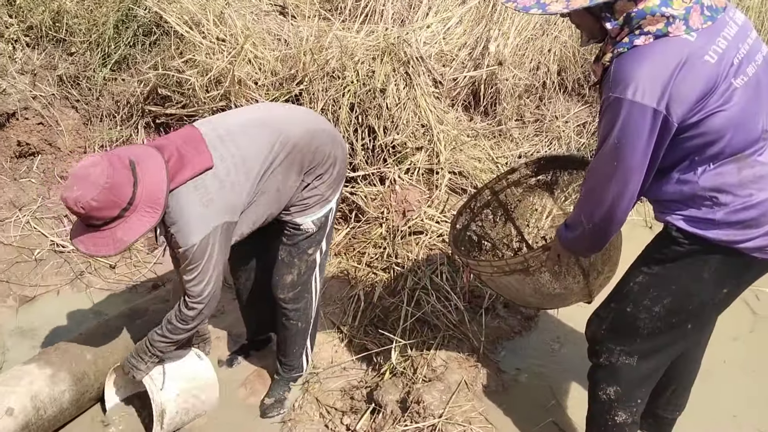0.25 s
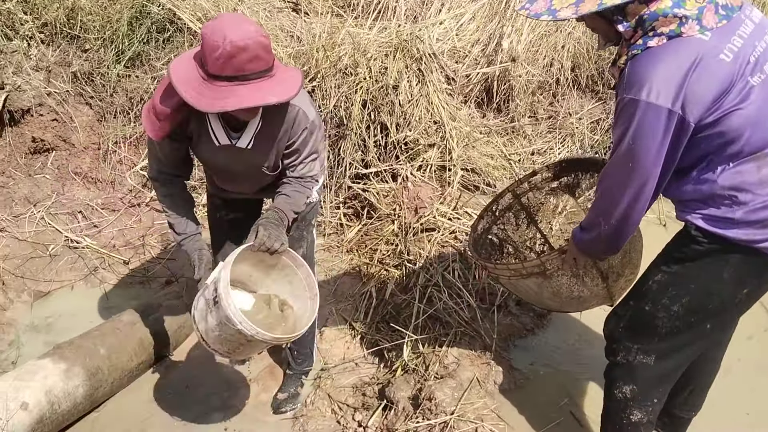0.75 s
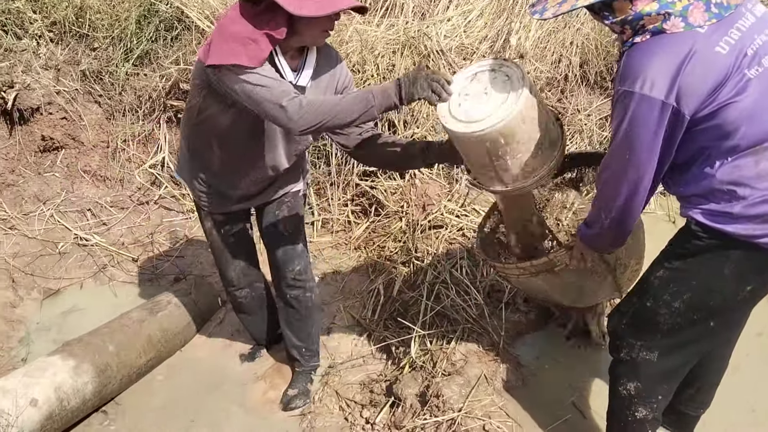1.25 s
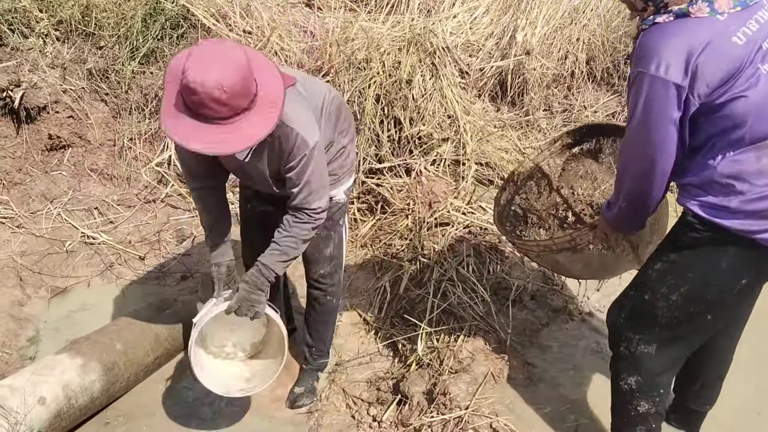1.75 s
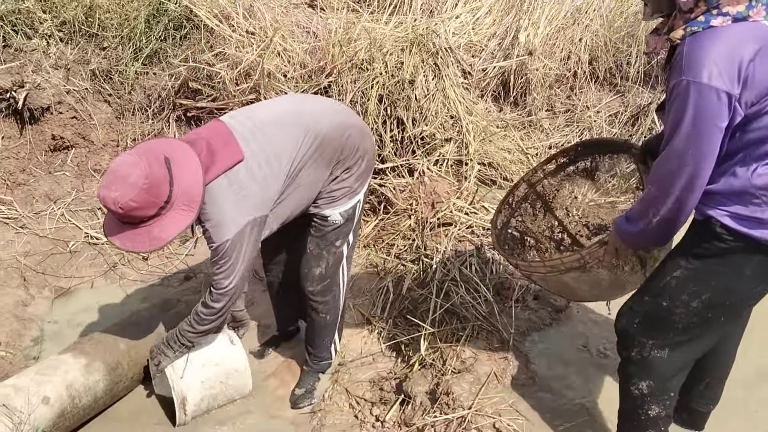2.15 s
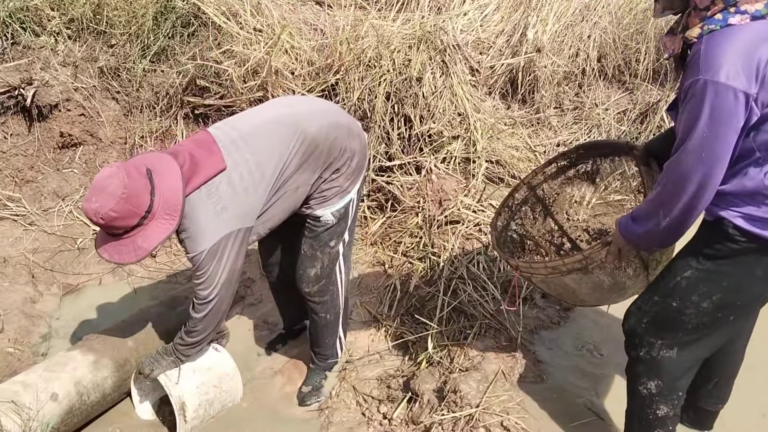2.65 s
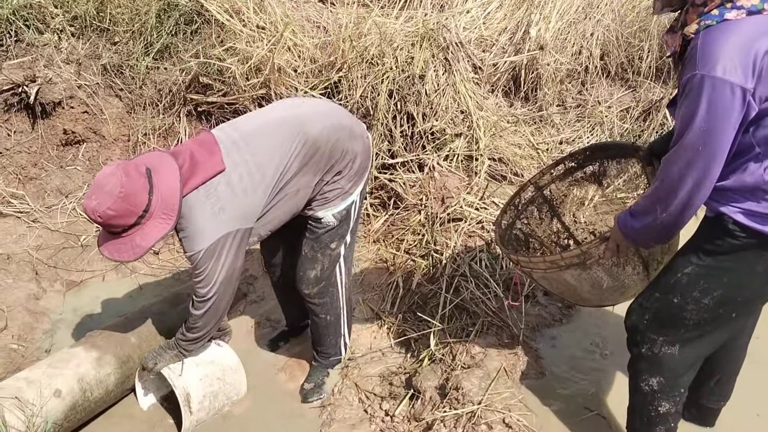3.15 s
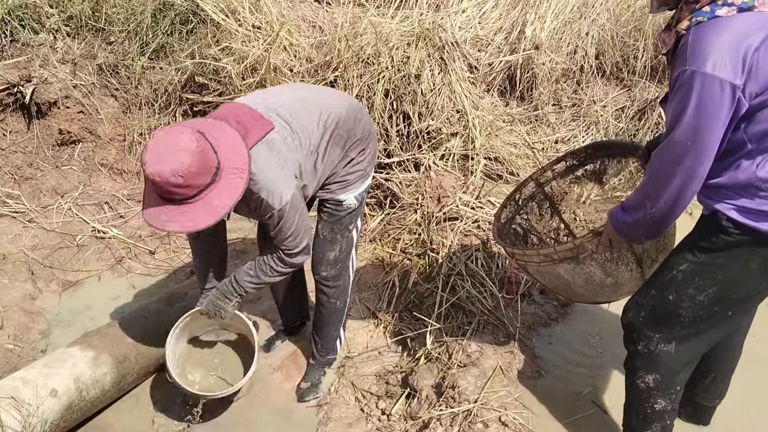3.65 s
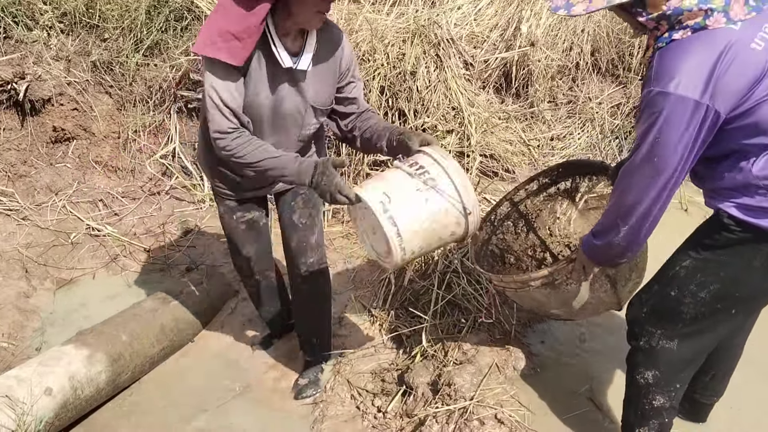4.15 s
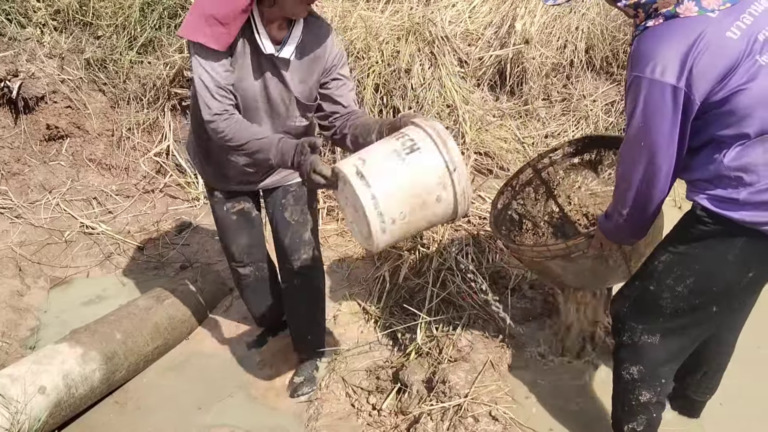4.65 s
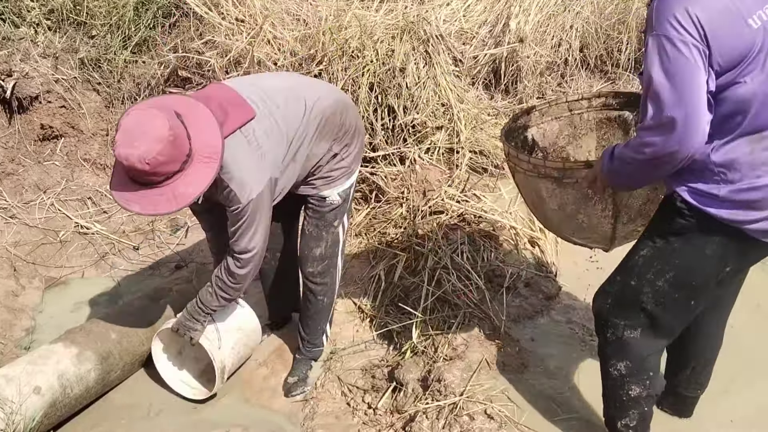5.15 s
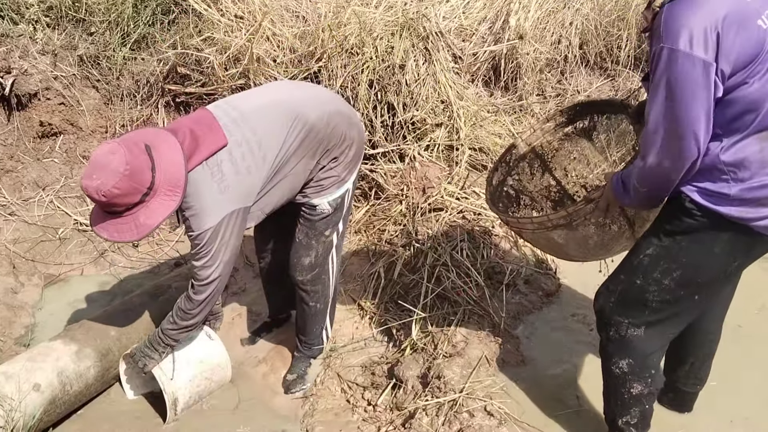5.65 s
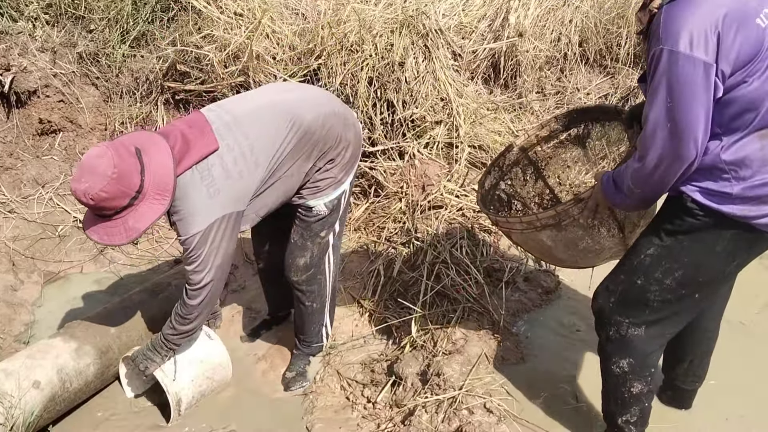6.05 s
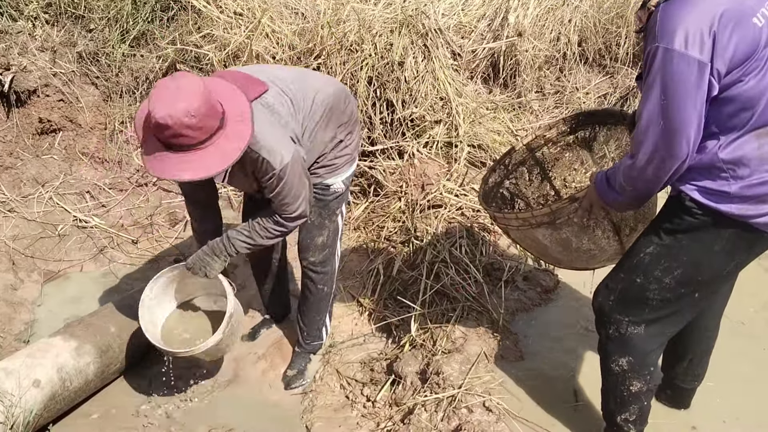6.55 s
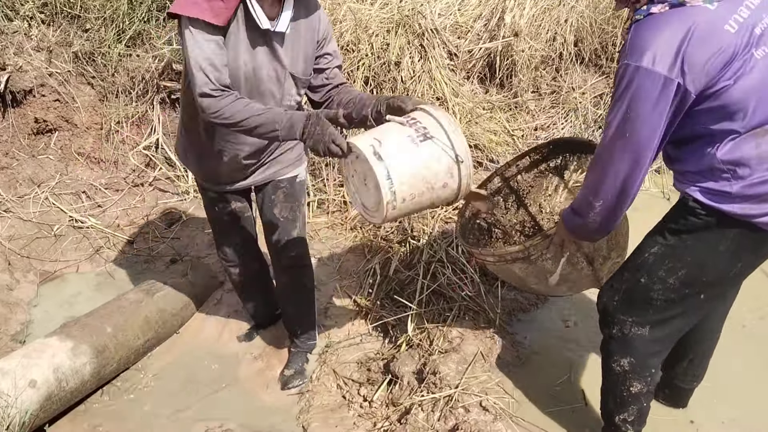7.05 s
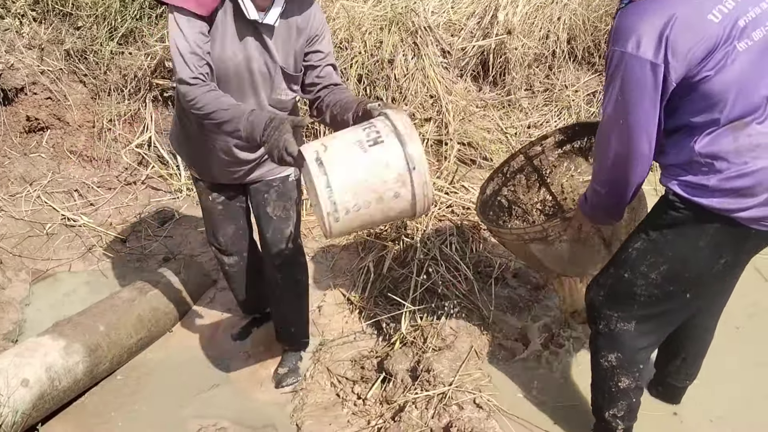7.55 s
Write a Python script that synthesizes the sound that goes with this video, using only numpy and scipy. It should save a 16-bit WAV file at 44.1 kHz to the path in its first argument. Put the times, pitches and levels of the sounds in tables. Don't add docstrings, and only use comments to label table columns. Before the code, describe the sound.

Outdoors in a quiet field, close to a hand-held phone, low wind rumbles and thumps unevenly, with a heavy puff near 0.15 s and others around 2.8, 3.3 and 4.9 s. Small bubbles and drips sound at 0.4-0.7 s as a bucket lifts. At 1.2-1.6 s muddy water gushes through a basket sieve and spatters, then thins to sparse drops. From 2.1 to 2.8 s the bucket dips with busy plops, foam fizz, splats and a deep gulp at 2.4 s. Quieter lapping and drips follow. A second, harder splash comes at 4.4-4.9 s, ending in a hollow gulp. Sloshing, bubbles and bright ticks run from 5.1 to 5.8 s; a wet slap and plop come at 6.5-6.6 s. The third pour splashes at 7.3-7.7 s and drains away. Faint high cricket chirps appear near 0.1, 3.2, 3.8-4, 5 and 5.9 s over soft distant air.

```python
import sys
import numpy as np
from scipy import signal
from scipy.fft import rfft, irfft
from scipy.io import wavfile
from scipy.ndimage import uniform_filter1d

SR = 44100
rng = np.random.default_rng(int(sys.argv[2]) if len(sys.argv) > 2 else 0)


def how_loud(loudness_db):
    steps = np.asarray(loudness_db, float) / 20
    return 10 ** steps


def unload_wav(signal):
    wavfile.write(
        sys.argv[1],
        SR,
        np.round(np.clip(np.atleast_2d(signal).T, -1, 1) * 32767).astype(np.int16),
    )


N = 343539


def rms_one(x):
    return x / np.sqrt(np.mean(x ** 2) + 1e-20)


def drift(rate_hz):
    r = np.exp(-80 * np.pi * rate_hz / SR)
    noise = rng.standard_normal(N // 40 + 2002)
    slow = signal.lfilter([1], [1, -2 * r, r * r], noise)[2000:]
    return np.interp(np.arange(N) / 40, np.arange(len(slow)), rms_one(slow))


def band(x, low_hz, high_hz, order=2):
    sos = signal.butter(order, [low_hz, min(high_hz, .46 * SR)], "band", fs=SR, output="sos")
    return signal.sosfilt(sos, x)


def bell(x, hz, width_hz, db):
    a, w = how_loud(db / 2), 2 * np.pi * hz / SR
    k = np.sin(w) * width_hz / hz / 2
    top = [1 + k * a, -2 * np.cos(w), 1 - k * a]
    bottom = [1 + k / a, -2 * np.cos(w), 1 - k / a]
    return signal.lfilter(top, bottom, x)


def placed(x, left_lag):
    return np.array([np.roll(x, int(round(left_lag))), x])


def add(track, start_s, sound):
    i = round(start_s * SR)
    track[:, i:i + sound.shape[1]] += sound[:, :N - i]


def swell(peak_s, db, rise_s, fall_s):
    t = np.arange(N) / SR - peak_s
    return db - 20 * np.where(t < 0, -t / rise_s, t / fall_s)


def ringing(clicks, hz, cycles):
    r, w = how_loud(-60 * hz / (cycles * SR)), 2 * np.pi * hz / SR
    return signal.sosfilt([[1, 0, -1, 1, -2 * r * np.cos(w), r * r]] * 2, clicks + 1e-18)


def grains(levels_db, low_hz, high_hz, count, per_s, cycles, uneven_db, clump_db, own_db, left_lag, spread):
    out, clumps = np.zeros((2, N)), drift(18.4)
    size = how_loud(uneven_db * np.minimum(rng.exponential(1, N), 4)) * rng.choice([-1, 1], N)
    full_rate = np.sum(per_s / np.max(per_s) * np.ones(N))
    for k, hz in enumerate(np.geomspace(low_hz, high_hz, count)):
        clicks = size * (rng.random(N) < per_s * np.sqrt(hz / 2000) / SR)
        rings = ringing(clicks, hz, cycles)
        rings /= np.sqrt(np.sum(rings ** 2) / full_rate)
        place = k / (count - 1) * (len(levels_db) - 1)
        below = min(int(place), len(levels_db) - 2)
        db = levels_db[below] + (place - below) * (levels_db[below + 1] - levels_db[below])
        db = db + clump_db * clumps + own_db * drift(15.7)
        out += placed(how_loud(db) * rings, left_lag + spread * rng.standard_normal())
    return out


def wind():
    # (time [s], strength [dB], left minus right [dB], rise and fall [s per 20 dB])
    puffs = [(.08, -35, -13, 0.24), (.62, -38, -0.5, .3), (.83, -31.5, -0.5, 0.3153),
             (1.1, -32.5, -1, 0.4044), (1.7, -35, -4, 0.2261), (2.21, -35, 1, 0.2432),
             (2.46, -37.5, -8.5, 0.48), (2.85, -34, 5, 0.5048), (3.31, -31.5, -1, 0.34),
             (3.9, -31, 1, 0.16), (4.27, -31, -3.5, 0.3083), (4.89, -41.5, 1.5, 0.28),
             (5.19, -36, 3.5, 0.07), (5.34, -40.5, -12, 0.41), (5.67, -42.5, 15.5, 0.48),
             (5.85, -44.5, -12, 0.28), (6.15, -34.5, 9.5, 0.3567), (6.46, -39.5, -1, 0.1),
             (6.82, -37, -3, .5), (7.08, -39.5, -6.5, 0.196), (7.62, -46.5, -9, 0.5)]
    out = []
    for side in (.5, -.5):
        swells = [swell(s, db + side * lean_db, span_s, span_s) for s, db, lean_db, span_s in puffs]
        rumble_db = np.max(swells, axis=0).clip(-55.5)
        lumps, noise = drift(8.48), rng.standard_normal((2, N))
        flutter_db = 0.329 * (rumble_db + 38.0) + 5.09 * lumps + 2.98 * drift(33) - 57.5
        rumble = how_loud(rumble_db + 3.28 * lumps - 1.0) * rms_one(band(noise[0], 20.65, 87.1, order=3))
        flutter = how_loud(flutter_db) * rms_one(band(noise[1], 81.8, 177.3, order=4))
        out.append(rumble + flutter)
    return np.array(out)


def gusts():
    # (time [s], level [dB], port [1 left, -1 right], length [s], upper flutter re rumble [dB])
    eddies = [(0.031, -28, -1.0, 0.0395, -21), (0.147, -13, -1.0, 0.0285, -9),
              (0.274, -32.5, -1.0, 0.055, -7), (0.78, -29, 1.0, 0.0444, -18),
              (0.81, -40.5, -1.0, 0.088, -24.5), (0.998, -29, 1.0, 0.0301, -39.5),
              (1.087, -32, -1.0, 0.0132, -39), (2.471, -31.5, 1.0, 0.046, -13.5),
              (2.701, -33.5, -1.0, 0.0269, -18.5), (2.796, -20.5, 1.0, 0.0125, -17),
              (2.84, -36.5, 1.0, 0.031, -20.5), (2.845, -35.5, -1.0, 0.033, -26),
              (2.883, -25, 1.0, 0.0211, -8.5), (3.147, -31, 1.0, 0.0126, -26.5),
              (3.186, -34, 1.0, 0.023, -31.0), (3.293, -16, 1.0, 0.0159, -10.5),
              (3.3, -27, -1.0, 0.0254, -25.5), (3.484, -29.5, 1.0, 0.042, -35),
              (3.568, -28, -1.0, 0.0295, -29), (4.266, -35, -1.0, 0.0303, -36),
              (4.892, -21, -1.0, 0.0193, -30.5), (6.169, -23, 1.0, 0.0248, -19),
              (6.795, -34, 1.0, 0.0354, -27.5), (6.863, -37, -1.0, 0.019, -32.5)]
    half = 3000
    out, t = np.zeros((2, N + 2 * half)), np.arange(-half, half) / SR
    for s, db, port, length_s, upper_db in eddies:
        noise = rng.standard_normal((2, len(t)))
        shape = np.exp(-(t / (0.46 * length_s)) ** 2)
        low = shape * band(noise[0], 51.0, 137.35, order=3)
        spill = how_loud(-29.5) * band(noise[0], 407, 523, order=3)
        upper = shape * (band(noise[1], 148.8, 278.7, order=3) + spill)
        eddy = rms_one(low) + how_loud(upper_db) * rms_one(upper)
        i = round(s * SR)
        out[int(port < 0), i:i + len(t)] += how_loud(db + 1.0) * eddy * np.sqrt(np.mean(shape ** 2))
    return out[:, half:N + half]


def field():
    # (frequency [Hz], density [dB per Hz])
    spectrum = np.array([(150, -2.5), (300, -4.5), (600, -15), (900, -7), (1500, -21), (3000, -17.5),
                         (8000, -20), (16000, -25)])
    shared, left, right = rng.standard_normal((3, N))
    hz = np.maximum(np.arange(N // 2 + 1) * SR / N, 20)
    colour = how_loud(np.interp(np.log(hz), np.log(spectrum[:, 0]), spectrum[:, 1]))
    alike = np.clip(0.647 / (1 + (hz / 1500) ** 2), 0, 1)
    pair = np.sqrt(alike) * rfft(shared) + np.sqrt(1 - alike) * rfft(np.array([left, right]))
    fade_db = 0.41 * np.arange(N) / SR
    return how_loud(-61.5 + 1.89 * drift(1.8) - fade_db) * rms_one(irfft(pair * colour, N))


def lapping():
    # (time [s], gurgle [dB], fizz re gurgle [dB], rise, fall [s per 20 dB])
    laps = [(.48, -51, -4.5, .25, 0.3831), (1.1, -68, -0.5, .4, 0.0052), (1.86, -66, 9, .2, 0.3358),
            (2.11, -53, -3.5, .15, 0.2331), (2.54, -50.5, -4, .4, 0.3974), (3.62, -56, -0.5, .25, 0.57),
            (4.37, -62, -8.5, .15, 0.06), (5.05, -62, 0, .3, 0.03), (5.35, -48.5, -5, .2, 0.4027),
            (5.55, -64, -0.5, .3, 0.87), (6.53, -55.5, 0.0, .5, 0.3529), (7.05, -66, -1, .6, 0.41)]
    gurgle_db = np.array([swell(s, db, rise_s, fall_s) for s, db, _, rise_s, fall_s in laps])
    fizz_db = gurgle_db + np.array(laps)[:, 2:3]
    return np.maximum(fizz_db.max(axis=0), -72), np.maximum(gurgle_db.max(axis=0), -71)


def slosh():
    fizz_db, gurgle_db = lapping()
    levels_db = [gurgle_db - 29, gurgle_db - 19.0, gurgle_db - 16.5,
                 fizz_db - 12.5, fizz_db - 16.5, fizz_db - 19.0]
    return grains(levels_db, 489.3, 9216, count=24, per_s=110, cycles=18, uneven_db=3.2,
                  clump_db=4.0, own_db=5, left_lag=-3.5, spread=1.5)


def ticks():
    size = how_loud(3.5 * np.minimum(rng.exponential(1, N), 3))
    drops = size * (rng.random(N) < 45 * how_loud(4 * drift(2.5)) / SR)
    t60_s = 0.00992
    tails = signal.lfilter([1], [1, -how_loud(-60 / (t60_s * SR))], drops + 1e-18)
    level_db = -56 + 0.76 * (lapping()[0] + 64)
    return placed(how_loud(level_db) * band(tails * rng.standard_normal(N), 4230, 15500), left_lag=2.2)


def cricket():
    # (start [s], end [s], level [dB])
    chirps = [(0.091, 0.172, -52.5), (3.166, 3.25, -51.5), (3.779, 3.855, -52), (3.966, 4.03, -53),
              (5.833, 5.906, -48), (5.984, 6.064, -49), (4.935, 5.0, -49), (5.045, 5.15, -54)]
    strokes_per_s, stroke_s = 212., .0009
    out, t = np.zeros((2, N)), np.arange(400) / SR
    for start, end, db in chirps:
        for s in np.arange(start, end, 1 / strokes_per_s):
            arch = np.sin(np.pi * ((s - start) / (end - start) * 0.63 + 0.053))
            hz = 7000 + 350 * arch + 140 * rng.standard_normal()
            stroke = t / stroke_s * np.exp(1 - t / stroke_s) * np.sin(2 * np.pi * hz * t)
            stroke_db = db - 6.5 + 10 * arch + 1.9 * rng.standard_normal()
            add(out, s, placed(how_loud(stroke_db) * stroke, left_lag=-10.5))
    return out


def washes():
    # (start [s], length [s], level [dB], centre [Hz])
    sheets = [(0.33, 0.16, -63, 2600), (0.34, 0.07, -65, 1400), (0.43, 0.06, -64, 4900),
              (0.555, 0.06, -54, 2900), (0.65, 0.05, -69, 1200), (1.745, 0.045, -53, 1700),
              (1.79, 0.1, -59, 500), (2.08, 0.04, -63, 5000), (2.105, 0.075, -53, 1400),
              (2.11, 0.08, -59, 2900), (2.213, 0.025, -50, 1900), (2.25, 0.06, -62, 1300),
              (2.255, 0.05, -63, 2900), (2.325, 0.02, -54, 3000), (2.41, 0.1, -53, 1500),
              (2.43, 0.07, -54, 2800), (2.55, 0.04, -61, 1100), (2.575, 0.06, -52, 2300),
              (2.635, 0.045, -59, 3800), (2.63, 0.05, -64, 1300), (2.71, 0.02, -52, 2400),
              (2.725, 0.06, -64, 1400), (2.765, 0.03, -62, 2600), (3.38, 0.1, -60, 2800),
              (3.54, 0.2, -57, 3000), (3.74, 0.17, -61, 3200), (3.6, 0.12, -64, 1300),
              (4.93, 0.05, -58, 4300), (5.07, 0.08, -57, 7400), (5.2, 0.05, -62, 3800),
              (5.27, 0.045, -58, 4800), (5.325, 0.075, -56, 1900), (5.357, 0.02, -59, 5500),
              (5.435, 0.06, -64, 4500), (5.545, 0.08, -64, 900), (5.56, 0.04, -58, 1900),
              (6.36, 0.06, -60, 2400), (6.474, 0.05, -56, 2200), (6.47, 0.04, -59, 10500),
              (6.535, 0.055, -62, 2700), (6.594, 0.025, -44, 3100), (6.596, 0.025, -49, 10300),
              (6.855, 0.04, -66, 4500), (7.05, 0.09, -70, 4700)]
    bursts_per_s, cycles, wide = 70, 22, 2 ** .5
    out = np.zeros((2, N))
    for s, length_s, db, hz in sheets:
        x = np.arange(round(1.3 * length_s * SR)) / SR / length_s
        shape = np.clip(x / .15, 0, 1) * how_loud(-5 * x - 90 * np.clip(x - 1, 0, 4))
        foam = np.zeros(len(x))
        for size_hz in np.geomspace(hz / wide, hz * wide, num=5) * rng.uniform(.95, 1.05, size=5):
            hits = rng.random(len(x)) < bursts_per_s * np.sqrt(hz / 2000) / SR
            bursts = hits * how_loud(4 * rng.standard_normal(len(x)))
            r = how_loud(-60 * size_hz / (cycles * SR))
            foam += ringing(bursts, size_hz, cycles) * (1 - r) ** 2
        hiss = rms_one(band(rng.standard_normal(len(x)), hz / wide, hz * wide))
        add(out, s, placed(how_loud(db) * shape * (rms_one(foam) + how_loud(-5) * hiss), left_lag=-4.5))
    return out


def bubble(hz, length_s, rise_per_s, rough):
    t = np.arange(round(4 * length_s * SR)) / SR
    x = t / length_s * 3.883
    noise = rng.standard_normal((2, len(t)))
    waver = 1 + rough * rms_one(uniform_filter1d(uniform_filter1d(noise, size=60), size=45))
    phase = 2 * np.pi * hz * (t + rise_per_s * t * t / 2) + 2.516 * waver[1]
    return x * np.exp(1 - x) * waver[0] * np.sin(phase)


def strays(count):
    gurgle_db = lapping()[1]
    share, draw = np.cumsum(how_loud(gurgle_db / 2)), rng.random((count, 3))
    i = np.searchsorted(share, draw[:, 0] * share[-1])
    peak_db = gurgle_db[i] / 2 - 26.5 - 9 * draw[:, 1]
    hz = 898.2 * 2 ** (2.6 * draw[:, 2])
    return list(zip(i / SR, peak_db, hz))


def plops():
    # (time [s], peak [dB], pitch [Hz])
    small_plops = [(2.122, -37, 1280), (2.153, -41, 1699), (2.176, -43.5, 2997), (2.215, -32, 2422),
                   (2.28, -52, 1302), (2.325, -45.5, 4260), (2.395, -49, 1383), (2.422, -38, 1206),
                   (2.446, -33, 2921), (2.543, -41.5, 2556), (2.586, -40, 1697), (2.617, -31, 3003),
                   (2.665, -43.5, 2790), (2.765, -43.5, 2223), (2.951, -52.5, 985), (.366, -54, 1450),
                   (.39, -53, 1500), (.463, -53, 1450), (.505, -52, 900), (.52, -50, 4700), (.55, -52, 1300),
                   (.585, -46, 2950), (.668, -54, 1000), (2.17, -45, 4300), (2.524, -43, 2500),
                   (2.59, -42, 5400), (5.396, -48, 4900), (5.63, -53, 1000), (5.766, -48, 5200),
                   (6.446, -50, 3000), (7.085, -52, 4500), (7.175, -49, 5200), (3.102, -47.5, 1030),
                   (3.235, -49, 1495), (3.366, -54, 1032), (5.108, -44.5, 816), (5.215, -42, 1446),
                   (5.253, -47, 2740), (5.343, -40.5, 1257), (5.368, -38, 1250), (5.444, -54.5, 1252),
                   (5.607, -46, 1115), (5.665, -51, 1306), (5.719, -54.5, 1670), (5.841, -44, 4718),
                   (6.08, -45, 1898), (6.2, -52.5, 679.5),
                   (0.492, -45, 1369), (0.56, -41, 3575), (0.594, -48.5, 912), (1.119, -55, 1929),
             (1.431, -33, 1312), (1.63, -35.5, 1990), (1.76, -42, 2538), (3.584, -48, 1642),
             (3.644, -46.5, 4244), (3.674, -47.5, 1296), (3.725, -48, 3490), (3.799, -53.5, 1256),
             (3.906, -44, 1139), (4.008, -54.5, 1307), (4.075, -57.5, 818), (4.222, -41, 3424),
             (4.317, -50, 1950), (4.527, -28.5, 1419), (4.626, -33.5, 686.4), (6.369, -46.5, 1959),
             (6.388, -47.5, 1036), (6.474, -34.5, 1883), (6.596, -33, 3694), (6.81, -48, 606),
             (6.941, -46.5, 2907), (7.182, -56, 1493), (7.258, -35, 4600), (7.337, -37, 1483),
             (7.402, -33, 1449), (7.482, -33.5, 701),
                   (0.502, -45.5, 3014), (0.578, -45, 4683), (0.594, -44.5, 2280), (1.348, -35.5, 1278),
                (1.83, -52.5, 4560), (2.134, -36, 1493), (2.279, -52, 5210), (3.346, -53.5, 1359),
                (2.649, -43, 3570), (4.442, -32, 3000), (4.497, -32.5, 1238), (5.204, -48.5, 4165),
                (5.24, -50.5, 4203), (5.273, -41, 3670), (5.443, -48.5, 4104), (5.57, -51.5, 1950),
                (5.601, -47.5, 2631), (6.598, -46, 1490), (6.871, -50.5, 4075)]
    # (time [s], peak [dB], pitch [Hz])
    gulps = [
        (2.125, -46.5, 269.4),
        (2.42, -25.5, 270.3),
        (2.552, -38, 223.5),
        (2.6, -36.5, 421.6),
        (4.881, -29.5, 420.2),
        (5.111, -53.5, 473),
        (5.561, -40.5, 280.3),
        (5.601, -45.5, 347.8),
        (6.595, -40, 433),
    ]
    out = np.zeros((2, N))
    for s, db, hz in small_plops + strays(count=90):
        ring = bubble(hz * .98, .013 * (hz / 1300) ** -.45, rise_per_s=3.08, rough=0.166 * hz / 1500)
        t = np.arange(len(ring)) / SR
        noise = rms_one(band(rng.standard_normal(len(ring)), hz * 0.63, hz * 1.487))
        fizz = noise * np.minimum(t / 0.001, 1) * how_loud(-60 * t / 0.056)
        fizz_db = -11.5 + 0.447 * (db + 41)
        add(out, s, placed(how_loud(db + 4.5) * (ring + how_loud(fizz_db) * fizz), left_lag=-3.5))
    for s, db, hz in gulps:
        ring = bubble(hz * .95, 0.028, rise_per_s=2.9, rough=0.233)
        add(out, s - .006, placed(how_loud(db + 1.5) * ring, left_lag=-1.0))
    return out


def snaps():
    # (time [s], peak [dB], centre [Hz])
    fine_drops = [(0.5023, -48, 6000), (0.637, -49, 5710), (1.5893, -32, 6300), (1.6354, -36, 6090),
                  (1.6901, -41, 9980), (1.71, -38, 6100), (1.8312, -50, 6560), (1.9081, -50, 6800),
                  (1.941, -54, 6740), (2.0752, -48, 5860), (2.1505, -47, 6220), (2.3845, -50, 9010),
                  (2.5676, -45, 5810), (2.6115, -39, 5890), (2.8459, -49, 5920), (3.0864, -53, 10000),
                  (3.6571, -40, 6270), (3.7983, -44, 7330), (4.7012, -24, 13300), (4.8643, -34, 6520),
                  (4.8888, -36, 6120), (4.9134, -39, 9540), (4.9387, -36, 7270), (4.9846, -41, 7050),
                  (5.0474, -46, 7300), (5.2749, -34, 14700), (5.3268, -50, 6000), (5.4171, -49, 9330),
                  (5.4954, -43, 6370), (5.5089, -41, 14900), (5.6521, -47, 6830), (5.7164, -52, 5830),
                  (5.7738, -44, 13700), (6.111, -44, 6040), (6.1629, -57, 6960), (6.2362, -46, 6730),
                  (6.2542, -52, 6350), (6.3455, -42, 6090), (6.3944, -51, 6380), (6.4094, -53, 5670),
                  (6.4278, -55, 5580), (6.6288, -43, 14400), (6.6812, -50, 6160), (6.7336, -46, 7030),
                  (6.767, -52, 15500), (6.8069, -60, 5890), (7.0584, -61, 5500), (7.0813, -55, 5500),
                  (7.0973, -42, 10500), (7.1736, -56, 5550), (7.2024, -63, 5890)]
    t60_s, wide = .02, 2 ** .3
    out, t = np.zeros((2, N)), np.arange(1000) / SR
    for s, db, hz in fine_drops:
        noise = rng.standard_normal((2, len(t)))
        patch = rms_one(band(noise[0], hz / wide, hz * wide))
        crack = how_loud(-10) * rms_one(band(noise[1], 3500, 15500))
        shape = how_loud(db + 1.5 - 60 * t / t60_s) * np.minimum(t / .0006, 1)
        add(out, s, placed(shape * (patch + crack), left_lag=2.2))
    return out


def splats():
    # (time [s], peak [dB], top end re core [dB])
    mud_drops = [(0.5668, -30, -16), (1.5021, -24.5, -9), (2.2158, -32, -41), (2.3095, -29.5, -15),
                 (2.4426, -26, -27), (2.523, -31, -11.5), (2.548, -34, -32.5), (2.589, -23, -26.5),
                 (2.6179, -28.5, -27), (2.7061, -21, -33.5), (2.764, -44.5, -30.5), (3.4634, -34, -37),
                 (4.115, -30, -18.5), (4.225, -33, -31), (4.345, -43.5, -3.5), (4.402, -46, 2),
                 (4.4409, -17.5, -21), (4.4658, -10, -28.5), (4.529, -10, -25), (7.339, -16, -25),
                 (5.1103, -26, -6), (5.243, -39, -11.5), (5.2974, -26.5, -10.5), (5.8402, -35.5, -36.5),
                 (6.0784, -28, -23.5), (6.366, -27.5, -27), (6.4742, -26.5, -27.5), (6.5325, -20, -20),
                 (6.5966, -17, -24), (6.9385, -22, -28.5), (6.983, -52.5, -3), (7.2585, -32, -24),
                 (4.9, -46, -4.5),
        (5.7668, -42.5, -4.5),
        (7.3022, -38, -12.5),
        (1.2381, -34, -20),
    ]
    out, t = np.zeros((2, N)), np.arange(2200) / SR
    for s, db, top_db in mud_drops:
        noise = rng.standard_normal((3, len(t)))
        ragged = how_loud(8.7 * uniform_filter1d(noise[2], size=40))
        decay = how_loud(-20 * t / 0.00834) + how_loud(-17 - 20 * t / 0.0246)
        shape = ragged * np.minimum(t / 0.00094, 1) * decay
        core = rms_one(band(noise[0], 2346, 4970, order=3))
        top = how_loud(top_db + 15.0) * rms_one(band(noise[1], 6890, 13270))
        add(out, s, placed(how_loud(db - 12) * shape * (core + top), left_lag=-2.5))
    return out


def flow():
    # (start [s], peak [dB], deep bubbles re peak [dB], length [s], drain [dB per s])
    pours = [
        (1.224, -37, 2, 0.34, 80),
        (4.406, -36.5, -4, 0.483, 50),
        (7.276, -35.5, -1, 0.3904, 69.5),
    ]
    # (time [s], level [dB])
    dregs = [
        (1.77, -48),
        (4.874, -45),
    ]
    jets_s, jets_db, rise_s, sag_db_per_s = 0.0436, -5, 0.1294, 30
    body_follows, depth_follows = 1.454, 1.94
    t = np.arange(N) / SR
    spray_db = body_db = depth_db = np.full(N, -110.)
    for start, db, deep_db, length, drain in pours:
        s = start + np.array([-.01, 0, jets_s, rise_s, length, length + 1])
        sag_db = sag_db_per_s * (rise_s - length)
        below_db = np.interp(t, s, [-70, -15, jets_db, 0, sag_db, sag_db - drain])
        puddle_db = np.interp(t, s[2:4], [-28.5 - depth_follows * jets_db, 0])
        spray_db = np.maximum(spray_db, db + below_db)
        body_db = np.maximum(body_db, db + 3 + body_follows * below_db)
        depth_db = np.maximum(depth_db, db + deep_db + depth_follows * below_db + puddle_db)
    for s, db in dregs:
        slop_db = swell(s, db, rise_s=0.0616, fall_s=0.082)
        body_db, depth_db = np.maximum(body_db, slop_db), np.maximum(depth_db, slop_db - 0.5)
    return spray_db, body_db, depth_db


def stream():
    # (frequency [Hz], left lead [rad])
    lead_curve = [(0, 1), (2670, -3), (4130, -6), (6460, 2.88), (7920, 10), (9820, -1.5), (16500, -6)]
    spray_db, body_db, depth_db = flow()
    thin = np.clip((-42 - spray_db) / 12, 0, 1)
    spray_levels_db = [body_db - 14.0, body_db - 10, spray_db - 7.5, spray_db - 9.5, spray_db - 11.5]
    spray = grains(spray_levels_db, 902, 16000, count=24, per_s=400 * how_loud(-14 * thin), cycles=4.65,
                   uneven_db=1.8, clump_db=2.4 + 1.5 * thin, own_db=3.2, left_lag=0, spread=2.8)
    bubble_levels_db = [depth_db - 19.5, depth_db - 8.5, depth_db - 11, body_db - 17.5, body_db - 16.5]
    bubbles = grains(bubble_levels_db, 255, 2851, count=16, per_s=80, cycles=9.74,
                     uneven_db=3.5, clump_db=2.5, own_db=3.5, left_lag=0, spread=2.1)
    left, right = how_loud(3.5 * thin) * spray + bubbles
    lead_rad = np.interp(np.arange(N // 2 + 1) * SR / N, *np.transpose(lead_curve))
    return np.array([irfft(rfft(left) * np.exp(1j * lead_rad), N), right])


def ports(air):
    # (frequency [Hz], width [Hz], gain [dB])
    left_cavity = [(560.3, 76, -6.5), (1273, 395, 5), (5340, 770, -3), (11538, 1380, -11.5),
                   (14850, 1270, 7)]
    # (frequency [Hz], width [Hz], gain [dB])
    right_cavity = [(616, 340, -1.5), (2144, 732, -6.5), (4414, 1860, 9), (5800, 340, -0.5),
                    (6400, 1080, 7), (7864, 1806, -19), (15200, 1500, 9.5), (12250, 4800, 4)]
    left, right = air
    for hz, width_hz, db in left_cavity:
        left = bell(left, hz, width_hz, db)
    for hz, width_hz, db in right_cavity:
        right = bell(right, hz, width_hz, db)
    dull = signal.sosfilt(signal.butter(6, 6847, fs=SR, output="sos"), right)
    return np.array([left, dull + how_loud(-17.0) * (right - dull)])


def scene():
    blown = wind() + gusts()
    near = slosh() + ticks() + cricket() + washes() + plops() + snaps() + splats() + stream()
    echo = how_loud(-19.0) * np.roll(band(near, 340, 6700), round(0.0037 * SR), axis=1)[::-1]
    return ports(near + echo + field()) + blown


def low_pass(x):
    return signal.sosfilt(signal.butter(12, 16960, fs=SR, output="sos"), x)


def record(dry):
    cut = signal.sosfilt(signal.cheby2(14, 45, 15990, fs=SR, output="sos"), dry)
    return low_pass(cut)


dry = scene()
out = record(dry)
unload_wav(out)
```